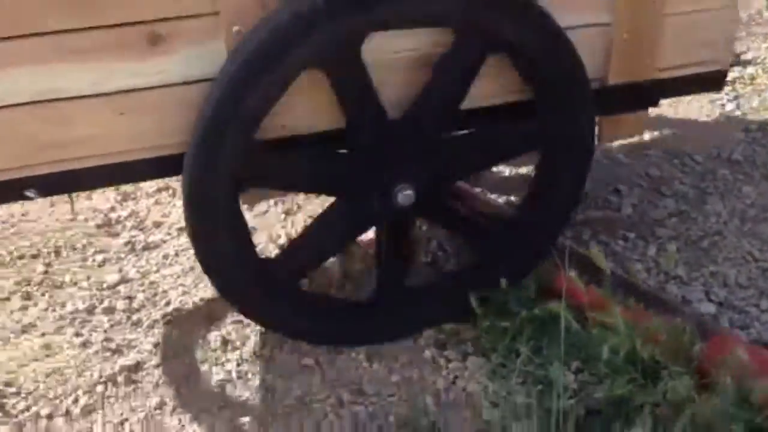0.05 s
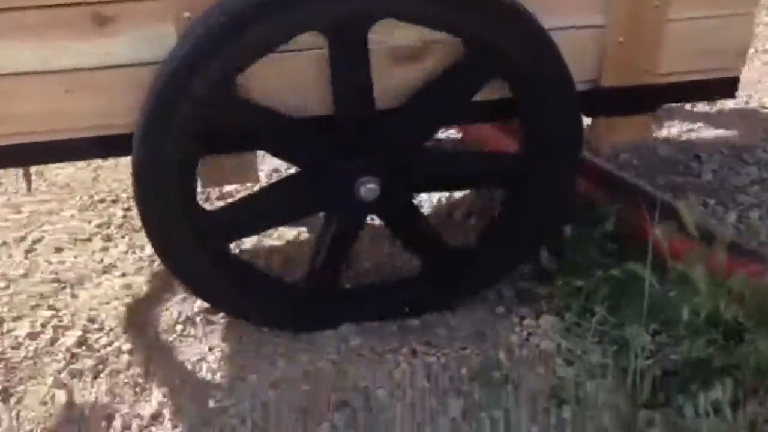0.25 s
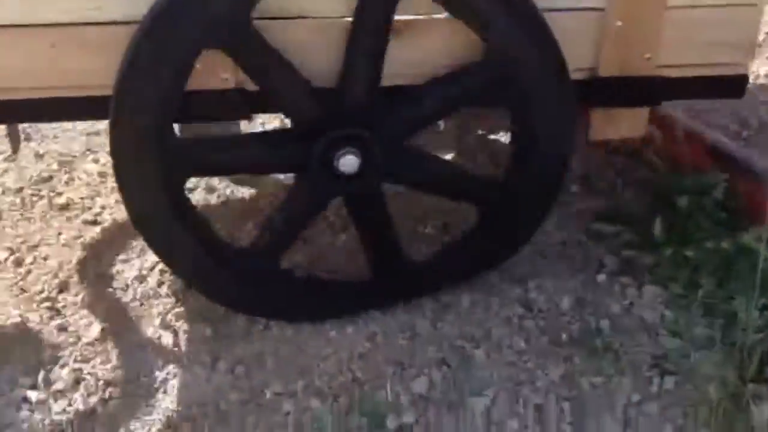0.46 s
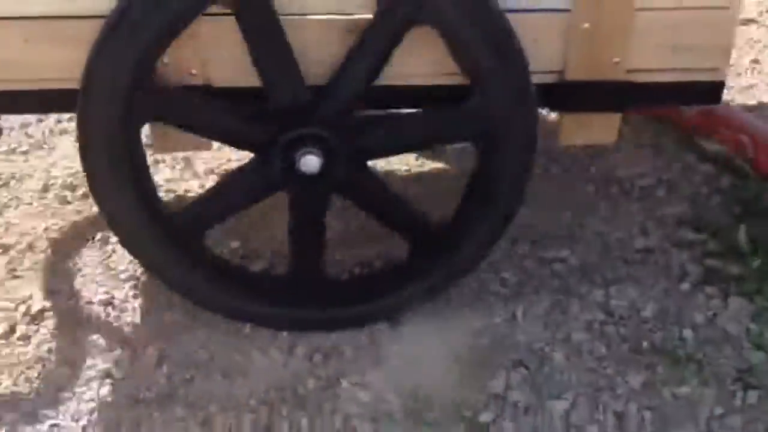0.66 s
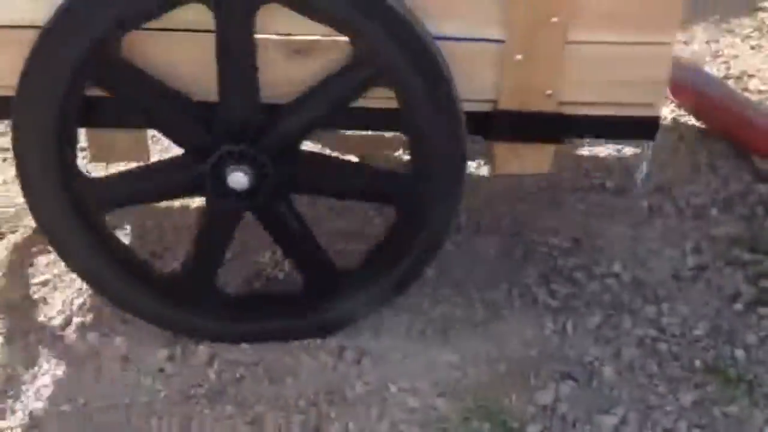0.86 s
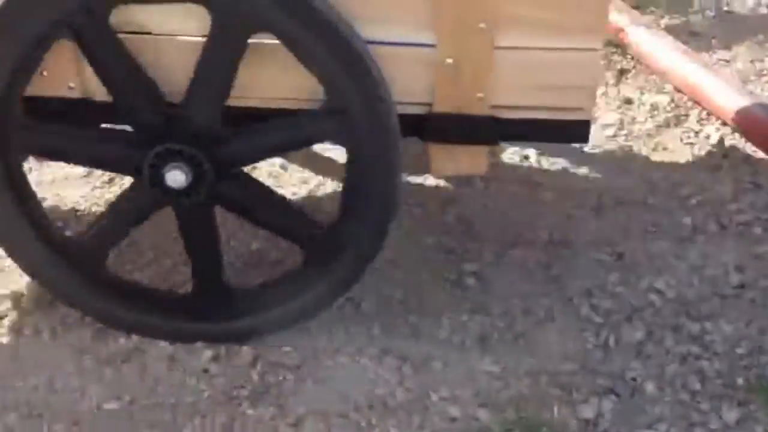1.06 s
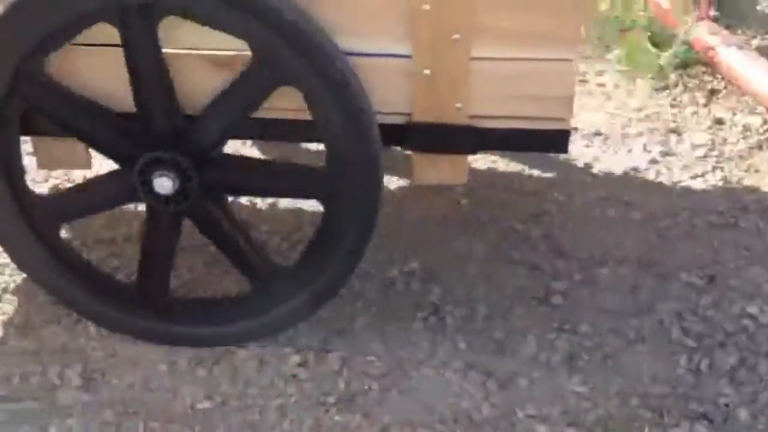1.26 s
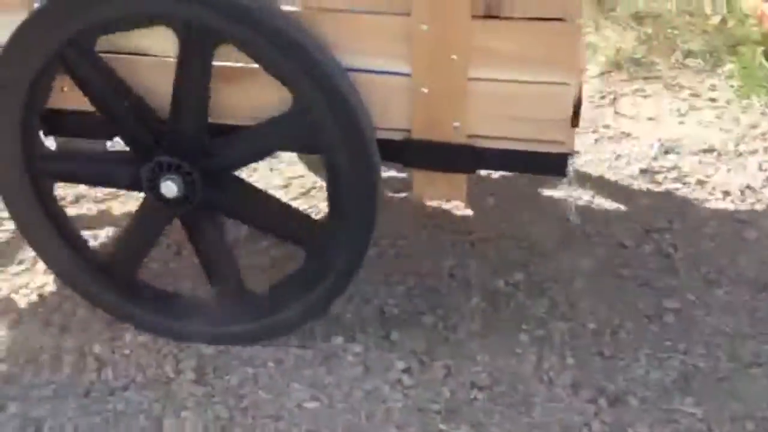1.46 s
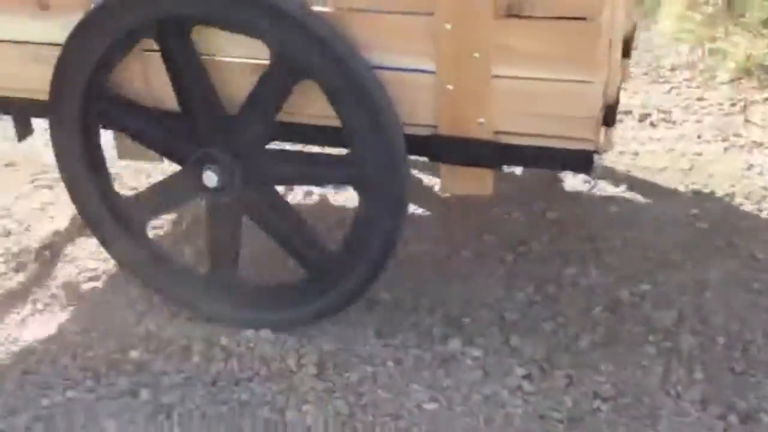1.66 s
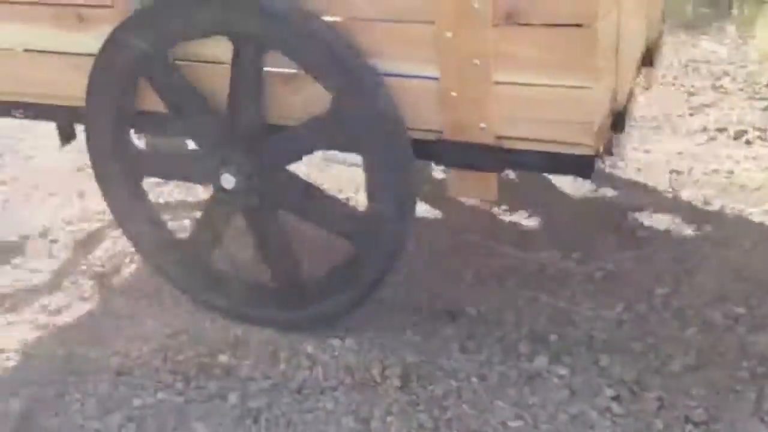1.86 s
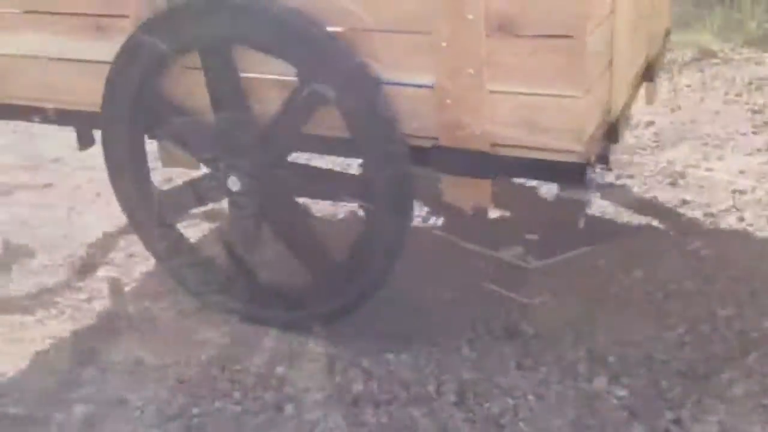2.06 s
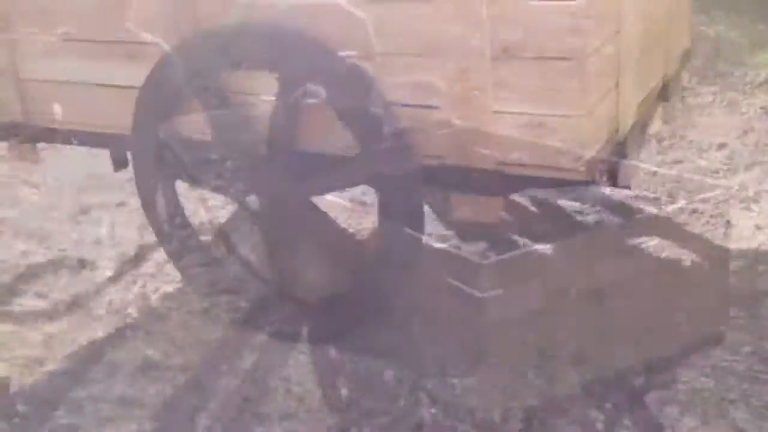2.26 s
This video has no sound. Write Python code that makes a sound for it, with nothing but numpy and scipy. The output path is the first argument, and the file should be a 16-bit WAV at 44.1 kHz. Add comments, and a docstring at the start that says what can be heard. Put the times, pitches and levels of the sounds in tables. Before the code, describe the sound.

Close by outdoors, a wooden cart clatters with a quick burst of knocks, thuds and crunching gravel. The noise settles into softer rolling, with stones ticking under the tyre and small rattles, over a low engine drone that fades slightly.

```python
"""A loaded wooden cart is towed over a bar and on across gravel, close by, outdoors.
From the start the towing engine drones in the background and gravel crunches under the tyre.
From about 0.25 to 0.75 s the wheel drops off the bar: planks and load knock, thud and rattle.
Then the cart rolls on more quietly. Single stones snap under the tyre and small parts clink,
while the engine slows a little and its drone fades."""
import sys
import numpy as np
from scipy import signal
from scipy.fft import rfft, irfft, next_fast_len
from scipy.io import wavfile
from scipy.ndimage import uniform_filter1d, map_coordinates

SR = 44100
rng = np.random.default_rng(int(sys.argv[2]) if len(sys.argv) > 2 else 0)


def dump_mix(stems):
    """Bounce the given channels to the path in sys.argv[1] as a 16-bit WAV at rate SR."""
    frames = np.atleast_2d(stems).T  # one column per channel
    limited = np.clip(frames, -1, 1)  # hard clip at full scale
    pcm = np.round(limited * 32767).astype(np.int16)
    wavfile.write(sys.argv[1], SR, pcm)


N = 101429  # samples, 2.3 s


# hard knocks (time [s], relative clack level [dB], relative crack level [dB], clack pitch [Hz])
KNOCKS = [(0.2475, -21.5, -39, 1510), (0.251, -23, -30, 1330), (0.2567, -20, -28, 1480),
          (.264, -16.5, -19, 1950), (.282, -17, -32, 3240), (.3115, -27, -30, 1710), (.332, -20, -27, 1340),
          (0.364, -14.5, -35, 1540), (0.371, -9.5, -30, 1650), (0.416, -46, -23, 1120),
          (.42, -24, -29, 1110), (0.4888, -23.5, -33, 1940), (0.507, -16.5, -27.5, 2020),
          (0.5163, -11.5, -32, 1930), (.5405, -24.5, -40, 1610), (0.567, -17, -38, 1370),
          (.571, -13, -28, 1270), (0.5757, -18, -42, 1910), (.601, -17, -33, 2390), (.662, -16, -35, 2100),
          (0.673, -15.5, -28, 2120), (0.7238, -19, -37, 1250), (.732, -15.5, -36, 1130),
          (.739, -28, -23, 2240)]
# tone of a crack: how strong its lows and highs are (frequency [Hz], level [dB])
CRACK_TONE = [(800, -35), (3000, 4), (4500, 3), (6200, 7), (8500, -3), (11000, -4), (15000, -27)]

def knocks():
    """Planks and load strike each other: each knock is a woody clack plus a bright crack."""
    times, clack_db, crack_db, pitches = np.transpose(KNOCKS)
    clack = clacks(times, clack_db - 1.5, pitches, fade_s=0.046, width=0.32, ring_db=8.5, sharp=0.75)
    crack = blows(times, crack_db + 2, response(CRACK_TONE), fade_s=0.05, sharp=0.35)
    return clack + crack


# notes the cart rings at when struck (pitch [Hz], width [Hz], strength [dB])
CART_NOTES = [(424, 22, 0), (549, 22, 3), (641, 20, 2), (713, 30, 1), (1030, 40, 0), (1215, 35, -5),
              (1633, 35, -5), (1965, 70, -4), (2145, 30, -5), (2445, 28, -2)]
# tone of struck wood (frequency [Hz], level [dB])
WOOD_TONE = [(250, -26.5), (800, 1.5), (2400, 0.5), (3200, -5), (9000, -20.5)]

def clacks(times, levels_db, pitches, fade_s, width, ring_db, sharp):
    """Each struck part adds its own note to the ring of the cart; width is a fraction of its pitch."""
    wood = response(WOOD_TONE, CART_NOTES)
    out = np.zeros(N)
    for start, db, hz in zip(times, levels_db, pitches):
        part = response([(hz, 0)], [(hz, width * hz, ring_db)], size=1024)
        out += blows([start], [db], ring(wood, part), fade_s, sharp)
    return out


# thuds of the wooden bed and its load (time [s], relative level [dB], pitch [Hz])
THUDS = [(.252, -11.5, 558), (0.266, -12, 720), (.2735, -14, 973), (.2905, -15.5, 705), (.332, -23.5, 530),
         (0.3713, -14.5, 1010), (.5155, -14.5, 703), (0.547, -23.5, 216), (.5705, -13, 615),
         (.5765, -19.5, 780), (.672, -15, 652), (0.6783, -17.5, 432), (0.6834, -20.5, 530),
         (.7165, -15, 670), (.731, -15, 710), (0.736, -22, 324), (0.7442, -17.5, 542), (1.658, -27, 227)]

def thuds():
    """Each heavy part rings briefly at its own pitch and shakes the planks around it."""
    fade_cycles, rise_s = 29.7, 0.0015
    out, t = np.zeros(N), np.arange(N) / SR
    for start, db, hz in THUDS:
        age = np.maximum(t - start, 0)
        rise = 1 - np.exp(-age / rise_s)
        note = np.sin(2 * np.pi * hz * age) * rise * fade(age, fade_cycles / hz)
        plank_tone = [(hz / 10, -50), (hz / 2, -4), (hz, 0), (hz * 2, -12), (hz * 10, -65)]
        planks = blows([start], [db - 4.5], response(plank_tone, CART_NOTES), fade_s=0.051, sharp=0)
        out += amp(db + 4.5) * note + planks
    return out


# how hard the load shakes (time [s], relative level [dB])
SHAKE = [(0, -46), (.05, -41), (.095, -30.5), (.15, -36), (.19, -35.5), (.23, -35.5), (.265, -22),
         (.32, -26.5), (.43, -28), (.47, -34.5), (.55, -23), (.59, -20), (.635, -20.5), (.68, -18),
         (.745, -20.5), (.8, -34.5), (.865, -31), (.91, -39), (1.15, -37), (1.29, -40), (1.36, -35),
         (1.45, -43), (1.56, -44), (1.69, -36), (1.84, -42), (1.9, -35), (1.99, -35.5), (2.05, -40.5),
         (2.11, -41), (2.18, -45.5)]
# tone of the rattle (frequency [Hz], level [dB])
RATTLE_TONE = [(40, -58), (100, -2.5), (170, -4.5), (260, 4), (350, -4.5), (480, -1), (680, 0.5),
               (900, -1.5), (1400, -5.5), (2000, -7), (2500, -11), (3200, -21), (5000, -28), (9000, -61)]

def rattle():
    """Many small taps ring the cart; gentle shaking moves only light parts, which sound thinner."""
    gentle_db, light_hz = -31.5, 815
    shake_db, = curves(SHAKE)
    heavy = unit(ring(taps(per_second=1600, spread_db=0.5), response(RATTLE_TONE, CART_NOTES)))
    light = unit(ring(taps(per_second=900, spread_db=1.0), response(RATTLE_TONE)))
    light = unit(signal.lfilter(*signal.butter(1, light_hz, "high", fs=SR), light))
    heavy_share = 1 / (1 + amp(1.1 * (gentle_db - shake_db)))
    parts = np.sqrt(heavy_share) * heavy + np.sqrt(1 - heavy_share) * light
    bumps_db = 2 * wobble(55.48)  # the ground is uneven
    return amp(shake_db - 1.13 + bumps_db) * parts


# light clinks while rolling on (time [s], relative level [dB], pitch [Hz])
CLINKS = [(0.9983, -26.5, 1930), (1.0927, -28.5, 1740), (1.257, -26.5, 1880), (1.5816, -25.5, 920),
          (1.598, -27.5, 1090), (1.6383, -30.5, 1950), (1.699, -28.5, 3080), (1.721, -31, 1740),
          (1.8795, -26.5, 1440), (1.943, -34, 2070), (1.973, -26, 2250), (2.09, -34, 1730),
          (2.282, -36.5, 2570)]

def clinks():
    """Small parts tap as the wheel rides over stones."""
    times, db, pitches = np.transpose(CLINKS)
    return clacks(times, db - 1, pitches, fade_s=0.036, width=0.45, ring_db=10.5, sharp=1.0)


# how hard the gravel crunches (time [s], relative crunch level [dB], relative sparkle level [dB])
CRUNCH = [(.03, -61.5, -78), (.09, -41, -63), (.13, -41.5, -47), (.16, -50, -54), (.2, -44.5, -37),
          (.235, -43.5, -51), (.26, -41, -42), (.3, -32, -50), (.375, -23.5, -30), (.405, -30, -38),
          (.425, -29, -16), (.45, -32, -45), (.463, -30, -25), (.545, -32.5, -55), (.6, -23, -48),
          (.635, -25, -52), (.655, -23, -45), (.7, -28, -35), (.735, -22.5, -25), (.76, -27, -44),
          (.785, -27.5, -49), (.83, -38, -45), (.86, -34, -28), (.9, -43.5, -37.5), (.98, -45, -35.5),
          (1.01, -37.5, -28.5), (1.07, -44.5, -37), (1.12, -41, -34.5), (1.4, -50, -44.5), (1.52, -52, -50),
          (1.7, -44.5, -46), (1.8, -56.5, -64), (2.1, -53.5, -49), (2.3, -56, -67)]
# tone of the crunch (frequency [Hz], level [dB])
CRUNCH_TONE = [(300, -109), (1500, -4), (3000, 0), (4200, -2), (5800, 1.5), (7800, -0.5), (9500, -4.5),
               (11000, -10), (13000, -10.5), (16000, -7.5)]
# tone of the sparkle, the very highest sound of the stones (frequency [Hz], level [dB])
SPARKLE_TONE = [(2000, -60), (9000, -15), (12000, -15), (14000, -7), (15200, -8.5), (16000, -3)]

def gravel():
    """Stones grind under the tyre, each tick with a short scrape; a heavier load makes more ticks."""
    crunch_db, sparkle_db = curves(CRUNCH)
    t = np.arange(SR // 50) / SR

    def stones(tone, base_rate):
        ticks = taps(per_second=base_rate + 8000 * amp(crunch_db), spread_db=2.5)
        scrape_level = np.sqrt(np.abs(ring(ticks ** 2, fade(t, 0.012) ** 2)))
        scrapes = unit(scrape_level * rng.standard_normal(N))
        return unit(ring(unit(ticks) + 1.7 * scrapes, response(tone)))
    return (amp(crunch_db - 0.75) * stones(CRUNCH_TONE, base_rate=490)
            + amp(sparkle_db + 3) * stones(SPARKLE_TONE, base_rate=500))


# stones snapping, and the short sharp crack of the knock at 0.264 s (time [s], relative click level [dB],
# relative sparkle level [dB])
SNAPS = [(0.2643, -16.5, -22), (0.2658, -20.5, -37), (.934, -31, -41), (.9405, -31, -39),
         (.9577, -24.5, -24), (0.991, -27, -17), (.999, -31, -37), (1.0105, -25, -33), (1.0337, -21, -21),
         (1.041, -23, -27), (1.063, -41, -32), (1.0982, -35, -27), (1.1015, -28.5, -19.5),
         (1.153, -30.5, -29), (1.175, -33, -35), (1.1955, -36, -38), (1.249, -26.5, -37), (1.259, -30, -28),
         (1.378, -38, -27.5), (1.421, -38, -31), (2.0897, -34, -51), (2.2343, -36, -47)]
# tone of a stone's click (frequency [Hz], level [dB])
CLICK_TONE = [(500, -29.5), (2000, -19), (4000, -33), (6200, -8), (8000, -8.5), (10000, -29), (13000, -8.5),
              (16000, -25)]

def snaps():
    """Single stones slip and crack under the tyre; the same short click gives the knock at 0.264 s its sharp
    crack."""
    times, click_db, sparkle_db = np.transpose(SNAPS)
    return (blows(times, click_db - 3.5, response(CLICK_TONE), fade_s=0.007, sharp=0.81)
            + blows(times, sparkle_db + 2.5, response(SPARKLE_TONE), fade_s=0.007, sharp=0.54))


def chips():
    """Chips of stone ring briefly, each at its own pitch, loudest when the gravel is crushed hard."""
    count, middle_hz, pitch_spread = 220, 6430, 0.446
    crunch_db, _ = curves(CRUNCH)
    crushing = np.sqrt(amp(crunch_db - crunch_db.max()))
    out, t = np.zeros(N + SR), np.arange(SR // 5) / SR
    for start, (pitch, size) in zip(rng.integers(N, size=count), rng.standard_normal((count, 2))):
        hz = min(middle_hz * np.exp(pitch_spread * pitch), SR / 2)
        level = crushing[start] * amp(crunch_db[start] + 3.5 + 2 * size)
        out[start:][:len(t)] += level * fade(t, 0.012) * np.sin(2 * np.pi * hz * t)
    return out[:N]


def pebbles():
    """Loose pebbles tick sharply, one by one, louder when the crunch is louder."""
    per_second = 110
    crunch_db, sparkle_db = curves(CRUNCH)
    t = np.arange(SR // 50) / SR
    hits = rng.random(N) < per_second / SR
    sizes = amp(3.5 * np.clip(rng.standard_normal(N), -2, 1.5))
    bursts = ring(hits * sizes, fade(t, 0.004))
    click = unit(ring(bursts * rng.standard_normal(N), response(CLICK_TONE)))
    sparkle = unit(ring(bursts * rng.standard_normal(N), response(SPARKLE_TONE)))
    return amp(crunch_db - 11.5) * click + amp(sparkle_db - 3.5) * sparkle


# stones that chink (time [s], level [dB], pitch [Hz], fade time [s])
CHINKS = [(0.456, -31.5, 13000, 0.15), (0.599, -26, 9730, 0.12)]

def chinks():
    """A squeezed stone rings briefly at one high note."""
    out = np.zeros(N)
    for start, db, hz, fade_s in CHINKS:
        tone = [(hz / 3, -50), (hz / 1.2, -20), (hz, 0), (hz * 1.2, -20)]
        stone = response(tone, [(hz, hz / 10, 12)])
        out += blows([start], [db], stone, fade_s, sharp=0)
    return out


# how fast the engine runs (time [s], speed [cycles per s])
ENGINE_SPEED = [(.3, 18.9), (.8, 18.45), (1.3, 18.0), (2.3, 17.8)]
# notes in the drone (pitch [times the engine speed], relative level [dB])
DRONE_NOTES = [(7, -19.5), (8, -11.5), (9, -1), (10, -1), (11, -9), (12, -5), (13, -13.5), (14, -3.5),
               (15, -5), (16, -7), (17, -9)]
# the drone fades as the engine draws away (time [s], level change [dB])
DRONE_FADE = [(.6, 1.5), (2.05, -1), (2.3, -3.5)]
# the firing note grows as the cart clears the bar (time [s], level [dB])
FIRING = [(1.05, -53), (1.3, -48.5)]
# tone of the low rumble (frequency [Hz], level [dB])
RUMBLE_TONE = [(20, -19), (45, -22), (70, -12.5), (100, -2.5), (160, 10.5), (280, -8), (360, -4.5),
               (600, -29), (2000, -32.5)]

def engine():
    """The towing engine's repeating cycle makes a firing note and a wavering drone over a low rumble."""
    speed, = curves(ENGINE_SPEED)
    fade_db, = curves(DRONE_FADE)
    firing_db, = curves(FIRING)
    angle = 2 * np.pi * np.cumsum(speed) / SR
    drone = np.zeros(N)
    for multiple, db in DRONE_NOTES:
        level = amp(db + 2.2 * wobble(3))
        drift = 2 * np.pi * rng.random() + 0.12 * wobble(8)
        drone += level * np.sin(multiple * angle + drift)
    firing = unit(np.sin(5 * angle))
    rumble = unit(ring(rng.standard_normal(N), response(RUMBLE_TONE)))
    return amp(firing_db) * firing + amp(fade_db - 40) * unit(drone) + amp(-41.5) * rumble


def amp(db):
    """Turn decibels into a number to multiply by."""
    return 10 ** (np.asarray(db) / 20)


def fade(t, fade_s):
    """Die away by 60 dB every fade_s seconds."""
    return amp(-60 * t / fade_s)


def unit(x):
    """Scale a sound to an average power of 1."""
    return x / np.sqrt(np.mean(x ** 2) + 1e-20)


def curves(rows):
    """Join a table's points with straight lines: one curve for each column after the time."""
    times, *columns = np.transpose(rows)
    return [np.interp(np.arange(N) / SR, times, column) for column in columns]


def wobble(per_second):
    """A smooth curve through this many random points a second."""
    points = rng.standard_normal(int(N * per_second / SR) + 4)
    return map_coordinates(points, [np.arange(N) * per_second / SR])


def response(tone, notes=(), size=8192):
    """How an object answers one tap, given its overall tone and the notes it rings at."""
    freqs = np.fft.rfftfreq(size, 1 / SR)
    hz, db = np.transpose(tone)
    gain = amp(np.interp(np.log(freqs + 1), np.log(hz), db))
    gain *= 1 + sum(amp(peak) / (1 + (2 * (freqs - pitch) / width) ** 2) for pitch, width, peak in notes)
    # keep this tone, but make all the ringing come after the tap
    folded = irfft(np.log(gain))
    folded[1:size // 2] *= 2
    folded[size // 2 + 1:] = 0
    return irfft(np.exp(rfft(folded)))[:size // 2]


def ring(x, body):
    """Play x through an object: every sample sets off the object's answer to a tap."""
    return signal.fftconvolve(x, body)[:len(x)]


def taps(per_second, spread_db):
    """Random taps of uneven size, evened out to a steady average power."""
    hits = (rng.random(N) < per_second / SR) * rng.choice([-1, 1], N)
    hits = hits * amp(spread_db * np.clip(rng.standard_normal(N), -2.5, 2.5))
    power = np.abs(uniform_filter1d(uniform_filter1d(hits ** 2, size=1100), size=700))
    return hits / np.sqrt(power + np.mean(hits ** 2) / 20)


def blows(times, levels_db, body, fade_s, sharp):
    """Each blow is one push of strength sharp and a dying scatter of small taps, ringing the body."""
    out, t = np.zeros(N + SR), np.arange(SR // 4) / SR
    for start, db in zip(times, levels_db):
        force = rng.standard_normal(len(t)) * fade(t, fade_s)
        force /= np.linalg.norm(force)
        force[0] += sharp
        hit = ring(force, body)
        loudest = np.sqrt(uniform_filter1d(hit ** 2, 128, mode="constant").max())
        out[int(start * SR):][:len(t)] += amp(db) * hit / loudest
    return out[:N]


def scene():
    """Add the cart, the stones and the engine into one channel."""
    clatter = knocks() + clinks() + rattle()
    stones = gravel() + chips() + chinks() + pebbles() + snaps()
    return (clatter + stones + thuds() + engine())[None]


def record(dry):
    """Clip the sound at full scale and remove the very highest treble."""
    top_hz = 15350
    size = next_fast_len(N + SR // 2)
    kept = np.fft.rfftfreq(size, 1 / SR) < top_hz
    spectrum = rfft(np.clip(dry, -1, 1), size)
    return irfft(spectrum * kept, size)[:, :N]


dry = scene()
out = record(dry)
dump_mix(out)
```